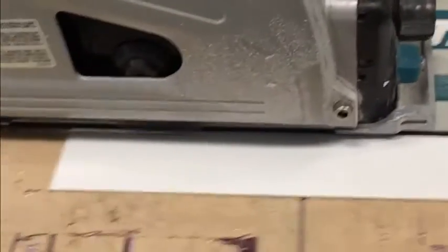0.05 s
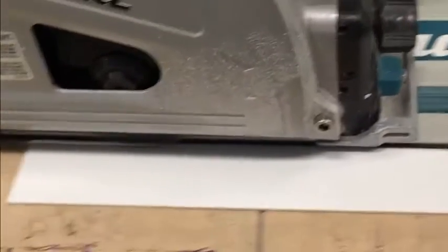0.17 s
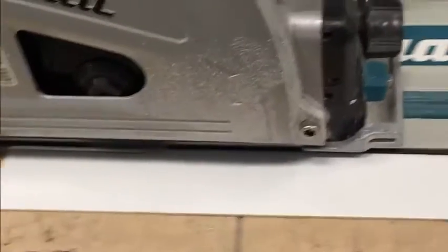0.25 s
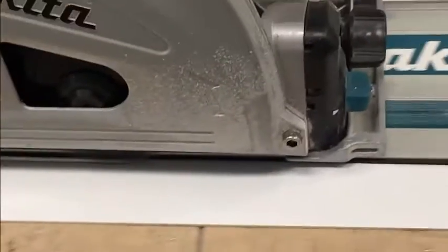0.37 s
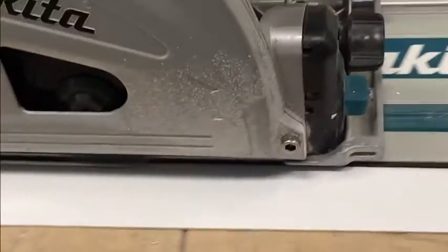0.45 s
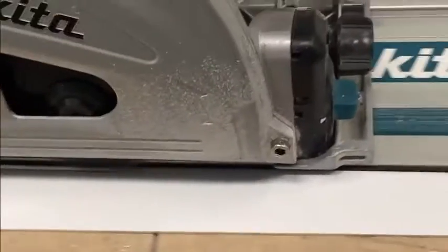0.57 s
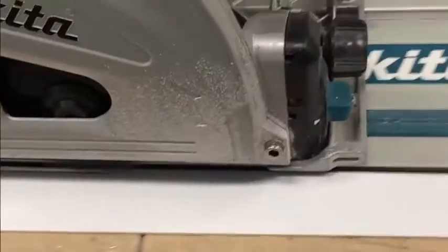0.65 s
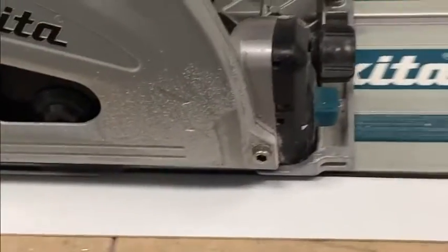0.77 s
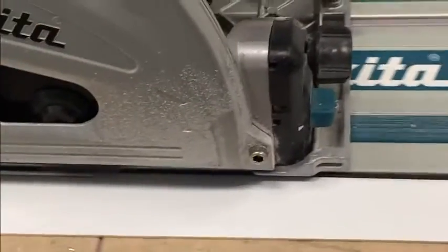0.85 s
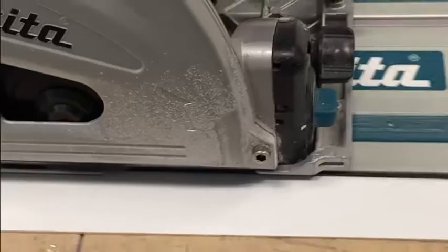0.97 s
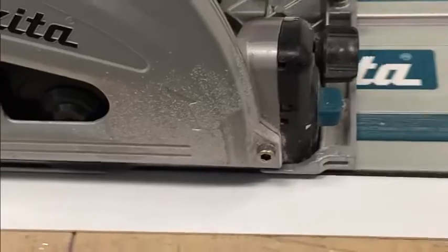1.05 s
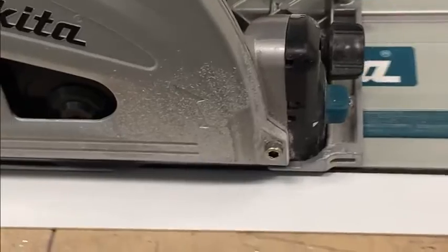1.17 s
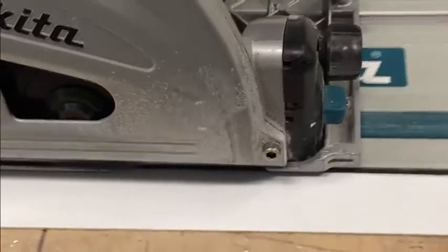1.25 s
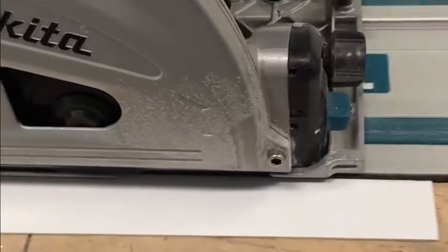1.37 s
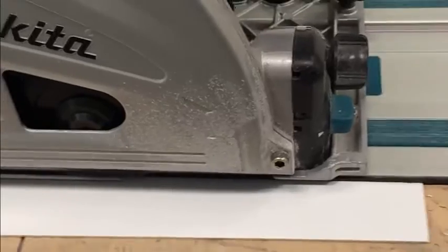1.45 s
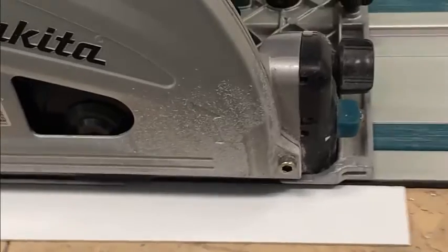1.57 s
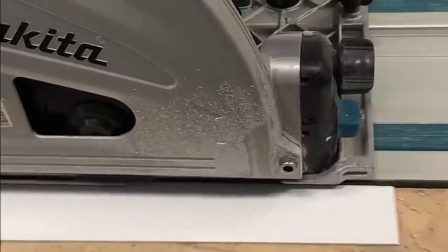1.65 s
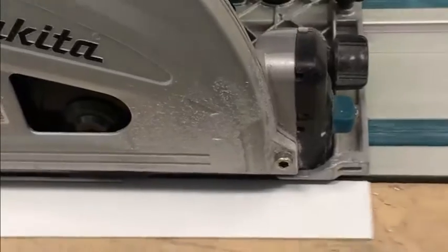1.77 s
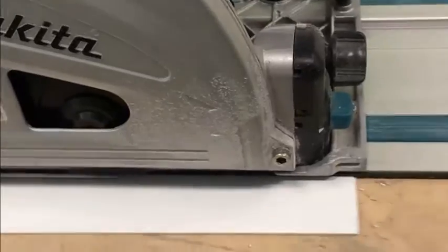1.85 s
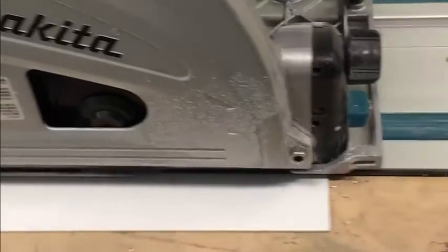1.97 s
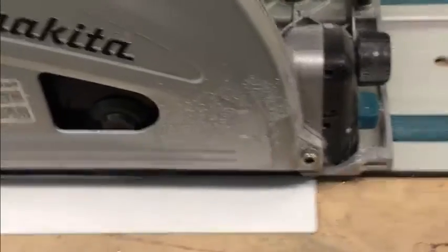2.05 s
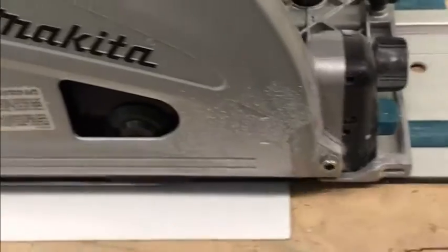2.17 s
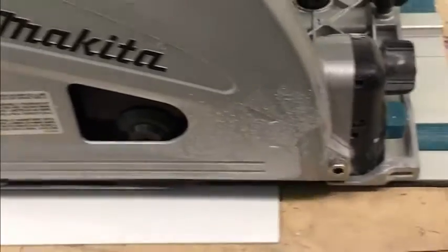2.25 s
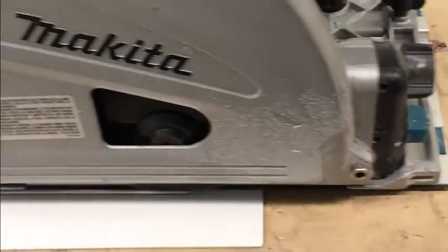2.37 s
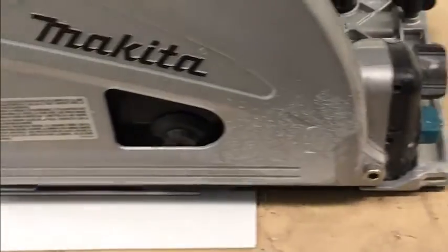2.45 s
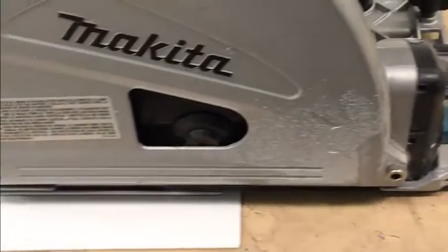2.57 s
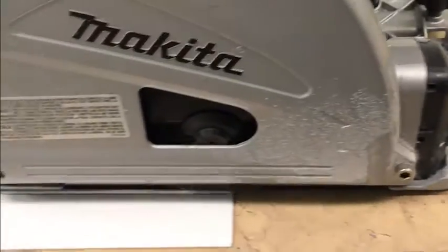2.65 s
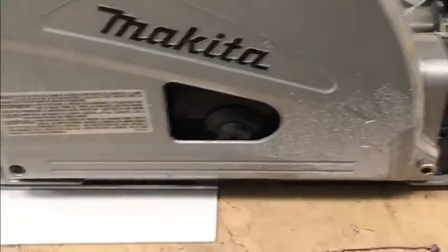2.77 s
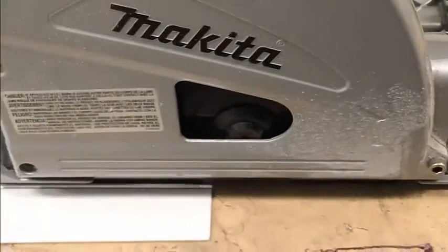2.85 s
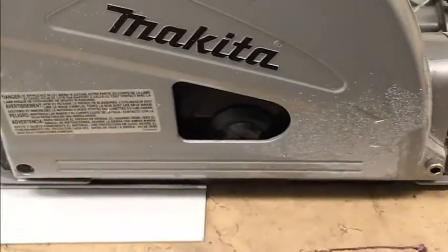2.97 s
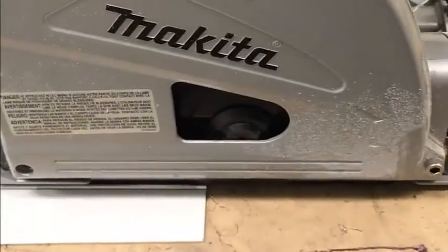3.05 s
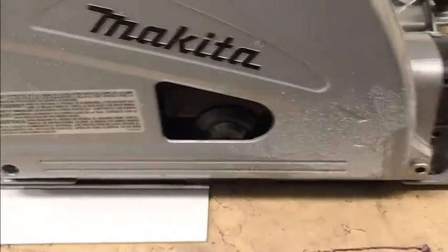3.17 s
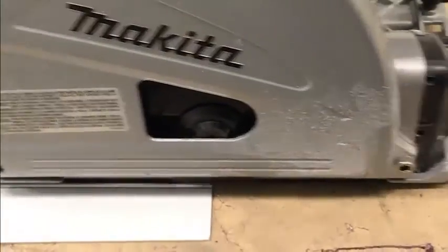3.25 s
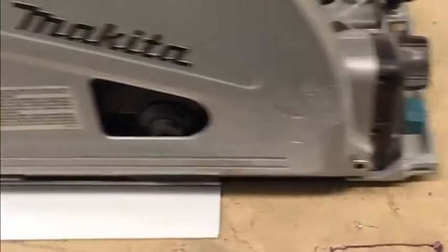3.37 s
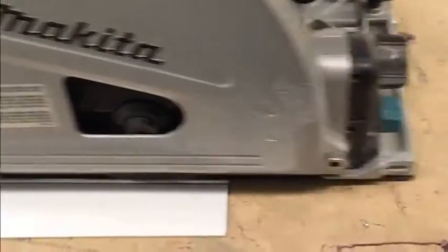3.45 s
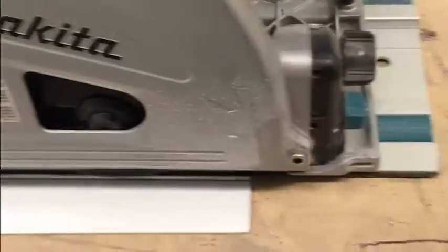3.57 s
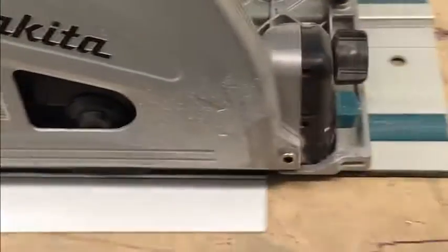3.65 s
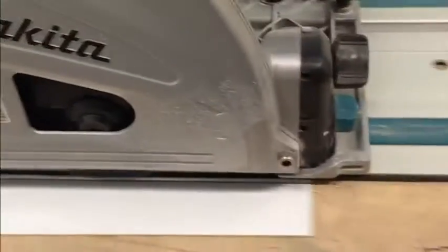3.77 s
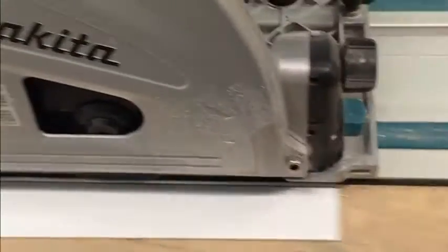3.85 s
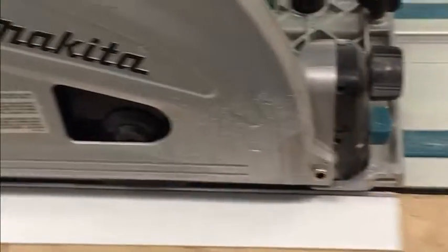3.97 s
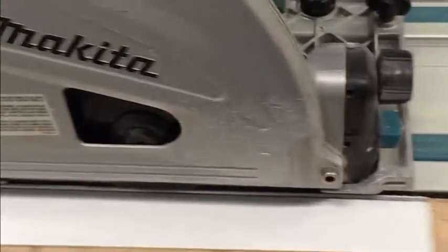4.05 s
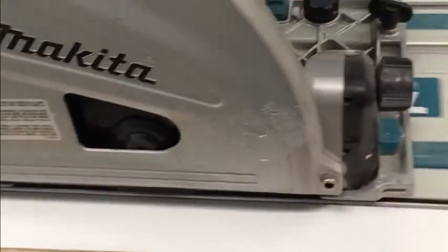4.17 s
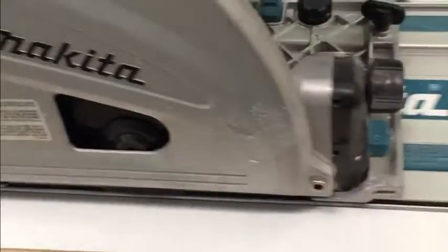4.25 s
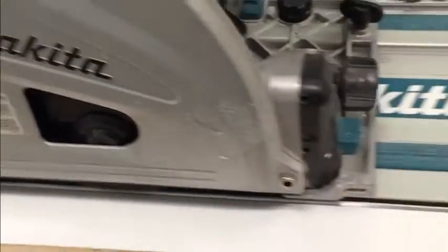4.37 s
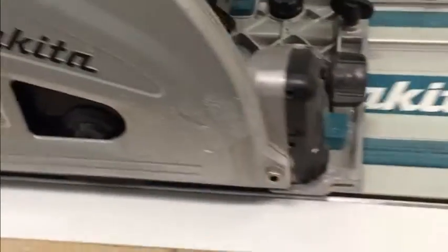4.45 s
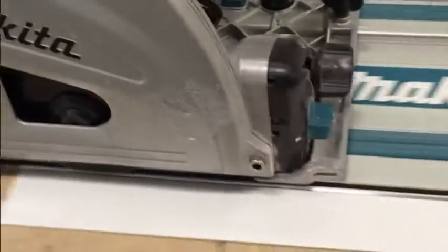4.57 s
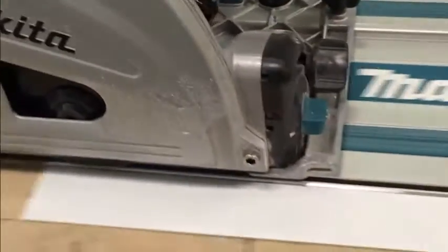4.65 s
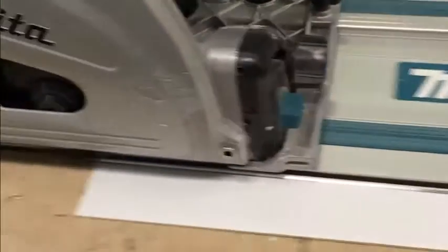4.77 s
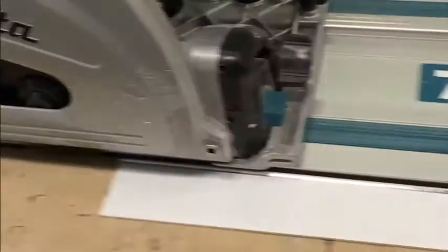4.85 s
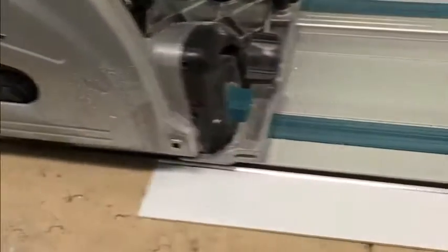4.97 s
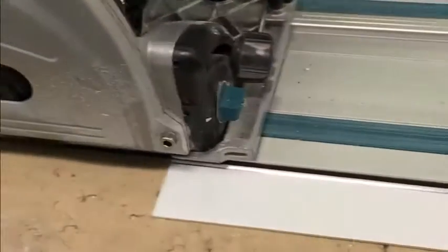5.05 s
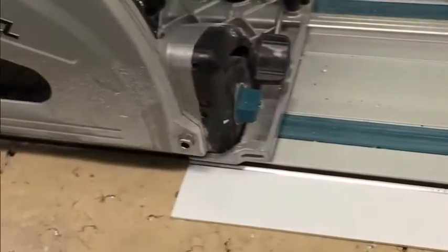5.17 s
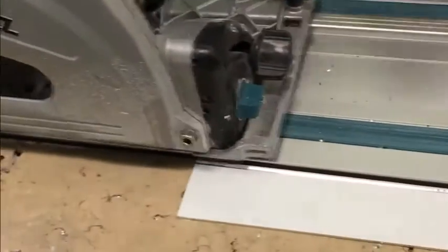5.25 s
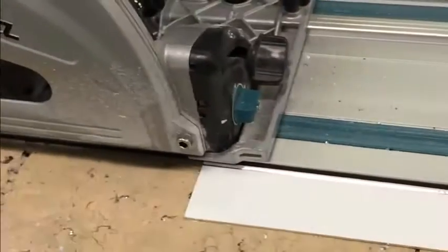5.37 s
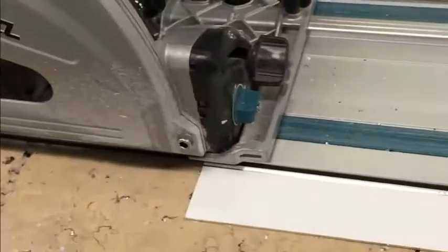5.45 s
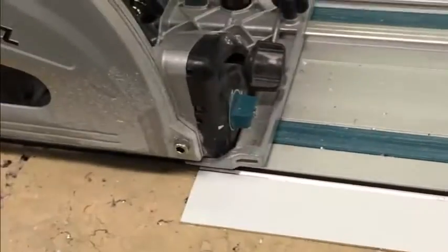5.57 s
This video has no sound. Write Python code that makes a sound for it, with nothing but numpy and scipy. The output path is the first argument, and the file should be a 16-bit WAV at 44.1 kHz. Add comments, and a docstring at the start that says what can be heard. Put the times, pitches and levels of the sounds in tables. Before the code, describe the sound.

A track saw cuts thin aluminium with a harsh buzzing rasp, rubs back through the groove, then starts winding down with a few knocks.

```python
"""A harsh buzz and rasp: a track saw is cutting thin aluminium sheet. The blade runs slightly out
of true, so its teeth bite in one burst a turn and shake the sheet's modes. It breaks out of the far
edge, runs free, is drawn back rubbing through the groove and is switched off. Motor whine, fan rush
and rumble carry on underneath; as they coast down, the saw knocks on its rail."""
import sys
import numpy as np
from scipy import signal
from scipy.fft import rfft, irfft, next_fast_len
from scipy.io import wavfile
from scipy.ndimage import uniform_filter1d

SR = 44100
rng = np.random.default_rng(int(sys.argv[2]) if len(sys.argv) > 2 else 0)


def dump_mix(stems):
    """Bounce the given channels to the path in sys.argv[1] as a 16-bit WAV at rate SR."""
    frames = np.atleast_2d(stems).T  # one column per channel
    limited = np.clip(frames, -1, 1)  # hard clip at full scale
    pcm = np.round(limited * 32767).astype(np.int16)
    wavfile.write(sys.argv[1], SR, pcm)


N = 247842
TIME = np.arange(N) / SR


def amp(db):
    """Decibels to gain."""
    return 10 ** (np.asarray(db) / 20)


def unit(x):
    """Scales to rms 1."""
    return x / np.sqrt(np.mean(abs(x) ** 2) + 1e-20)


def bell(x, centre, half):
    """A smooth bump of height 1."""
    return np.exp(-((x - centre) / half) ** 2)


def eq_db(points, hz):
    """Reads an EQ curve drawn in straight lines over log frequency."""
    point_hz, db = np.transpose(points)
    return np.interp(np.log(hz + 1), np.log(point_hz), db)


def automation(points):
    """Joins (time, value) points into a value for every sample."""
    return np.interp(TIME, *np.transpose(points))


def colour(x, points):
    """Plays x through an EQ curve, out at rms 1."""
    size = next_fast_len(N)
    gain = amp(eq_db(points, np.fft.rfftfreq(size, 1 / SR)))
    return unit(irfft(rfft(x, size) * gain, size)[:N])


def wander(rate_hz):
    """Smooth random movement of rms 1, no faster than rate_hz."""
    t = TIME[::64]
    drift = sum(np.sin(2 * np.pi * (hz * t + rng.random()))
                for hz in np.geomspace(rate_hz / 12, rate_hz, num=16))
    return np.interp(TIME, t, unit(drift))


def bite(turns, length, graze):
    """Depth of cut through each turn: the high teeth dig in at once, the others only graze."""
    age = (turns % 1) / length
    return graze + (1 - np.exp(-8 * age)) * np.exp(-age ** 2)


def tooth_harmonics(frames_s, length, graze, drift_s, count=122, size=256):
    """Harmonics of one ragged burst a turn, slowly changing as the blade travels."""
    ragged = bell(frames_s[:, None], frames_s, drift_s) @ rng.standard_normal((len(frames_s), size))
    burst = ragged * bite(np.arange(size) / size, length, graze)
    return unit(rfft(burst, axis=1)[:, 1:count + 1])


# The saw goes out along the sheet, lingers and comes back faster: time_s, place_cm
SAW_PATH = [(0, 0.5), (2.75, 28), (3.3, 29), (4.8, 4)]
# Ringing modes of the sheet: pitch_hz, half_width_hz, swing_db, belly_place_cm, belly_spacing_cm
SHEET_RESONANCES = [(620, 45, 6, 20.7, 44.3), (709, 37, -1, 2.7, 48), (810, 39, 3.5, 15.5, 40),
                    (880, 37, 5.5, 8.3, 9.6), (982, 45, 8.5, 6.3, 24), (1097, 110, 1.5, 11.5, 13.3),
                    (1161, 24, 5, 25, 54), (1240, 33, 1.5, 9.4, 49), (1364, 58, 3, 7.4, 9.8),
                    (1595, 61, 4.5, 23, 25), (1683, 45, 4.5, 5.4, 22), (2066, 160, 6.5, 23.8, 28.2),
                    (2240, 194, 3.5, 2.2, 9.16), (2600, 78, 3.5, 3.6, 49)]
# A mode of blade or sheet catches and squeals: peak_s, pitch_hz, half_length_s, boost_db
METAL_SQUEALS = [(.14, 2200, .11, 5), (.45, 1683, .15, 3), (0.267, 709, 0.18, 6), (.42, 3180, 0.16, 8),
                 (.45, 5848, .12, 9), (.62, 1418, .2, 0), (.7, 5228, .11, 14), (1.003, 4740, .16, 13.5),
                 (1.038, 3544, 0.16, 15.5), (1.05, 2240, .12, 3), (2.03, 2100, .16, 3.5),
                 (2.3, 6340, .12, 11), (2.44, 5316, .14, 16), (4.41, 1700, 0.098, 9), (4.36, 4830, .36, 13)]


def standing_waves(frames_s, hz, squeal_width=0.033):
    """Boost in dB: modes swell and fade as the blade passes bellies and nodes, and some squeal."""
    place_cm = np.interp(frames_s, *np.transpose(SAW_PATH))[:, None]
    sheet_db = sum(db * np.cos(2 * np.pi * (place_cm - belly) / spacing) * bell(hz, centre, width)
                   for centre, width, db, belly, spacing in SHEET_RESONANCES)
    squeal_db = sum(db * bell(frames_s[:, None], peak_s, half) * bell(hz, centre, squeal_width * centre)
                    for peak_s, centre, half, db in METAL_SQUEALS)
    return sheet_db + squeal_db


# Peaks and notches of the blade guard: centre_hz, half_width_hz, gain_db
GUARD_EQ = [(420, 37, -5.5), (512, 170, 1.5), (717, 44, -2.5), (1000, 106, 2.5), (1405, 57, 4.5),
            (2140, 260, -2), (2600, 200, 3.5), (2860, 60, 2), (3380, 110, 5), (3800, 80, -0.5),
            (4230, 300, 2), (6300, 130, -2.5), (6900, 80, -4.5), (7210, 70, 6.5), (7670, 44, 4.5),
            (8300, 180, 2.5), (8740, 120, 3), (8900, 140, -7.5), (9600, 90, -3), (10500, 90, 5),
            (11050, 59, -10)]


def blade_guard(x):
    """The cavity around the blade colours the noise made inside it."""
    hz = np.arange(20., SR / 2, 12)
    gain_db = sum(db * bell(hz, centre, width) for centre, width, db in GUARD_EQ)
    return colour(x, np.transpose([hz, gain_db]))


# Splits between five bands, four of sheet buzz and the tooth rasp on top: crossover_hz
CROSSOVERS = [1020, 1290, 1900, 2450]
# Tone of the tearing chips: frequency_hz, level_db
CHIP_EQ = [(100, -36), (300, -29), (500, -1), (1100, 2.5), (1550, 10), (2100, 6), (2800, -10),
           (4500, -22.5), (6500, -31), (11000, -10)]


def cut(turns, bands, buzz_levels, rasp_eq, *, buzz_db, whistle_db, octave_db, bite_turns, graze,
        drift_s, jitter_turns, lead_turns, shake_db, chatter_db,
        rasp_db=-0.5, grit_db=-7.5, flutter_db=5, teeth=48, blade_hz=88.6):
    """One pass of the blade: the sheet buzzes, the teeth rasp and whistle, torn chips add grit."""
    frames_s = np.arange(0, 6, .04)
    harmonics = tooth_harmonics(frames_s, bite_turns, graze, drift_s)
    k = np.arange(1, harmonics.shape[1] + 1)
    hz = k * blade_hz
    band_of = np.searchsorted(CROSSOVERS, hz)
    rasping = band_of == len(CROSSOVERS)
    # the sheet's modes hold the low harmonics steady; the high ones come and go with the teeth
    harmonics /= (abs(harmonics) + 0.081) ** np.where(rasping, .65, .92)
    harmonics *= amp(np.where(rasping, eq_db(rasp_eq, hz), np.interp(k, *np.transpose(buzz_levels))))
    # metal smearing on the teeth makes each harmonic flutter, the high ones most
    harmonics *= amp(flutter_db * np.where(rasping, 1, .35) * rng.standard_normal(harmonics.shape))
    # the teeth rasp a little before the sheet has swung up
    harmonics *= np.exp(2j * np.pi * k * lead_turns * rasping)
    for band in np.unique(band_of):
        harmonics[:, band_of == band] /= np.linalg.norm(harmonics[:, band_of == band], axis=1)[:, None]
    harmonics *= amp(standing_waves(frames_s, hz))
    # no two turns bite at quite the same moment
    turns = turns + jitter_turns * wander(70)
    touching = bands[-1] > 0
    spin, wave = np.exp(2j * np.pi * turns[touching]), 1
    tones = np.zeros((len(bands), touching.sum()))
    for strength, band in zip(harmonics.T, band_of):
        wave = wave * spin  # next harmonic up
        tones[band] += np.sqrt(2) * (np.interp(TIME[touching], frames_s, strength) * wave).real
    tones *= bands[:, touching]
    metal = np.zeros(N)
    metal[touching] = amp(buzz_db) * tones[:-1].sum(0)
    metal[touching] += amp(rasp_db + chatter_db * wander(150)[touching]) * tones[-1]
    # chips tear off while the teeth are deep in the metal
    depth = bite(turns + lead_turns, bite_turns * .6, graze=.35)
    chips = amp(grit_db) * blade_guard(colour(rng.standard_normal(N) * depth, CHIP_EQ))
    tooth_phase = 2 * np.pi * teeth * turns
    whistle = np.sin(tooth_phase) + amp(octave_db) * np.sin(2 * tooth_phase)
    whistle *= amp(whistle_db + 1.6 * wander(4.5))
    force = np.sqrt(np.linalg.norm(bands[:-1], axis=0) * bands[-1])
    return (metal + force * (chips + whistle)) * amp(shake_db * wander(50))


def band_gains(response, pressure_db, start_s, end_s, full_bite_db=-12.5):
    """Each band rides the blade's pressure, gated to the time it is in the sheet."""
    contact = np.clip(np.minimum(TIME - start_s + 0.012, end_s - TIME) / 0.017, 0, 1)
    return contact * np.array([amp(db + slope * (pressure_db - full_bite_db)) for db, slope in response])


# How hard the blade is fed forward: time_s, pressure_db
FEED_PRESSURE = [(0.0, -15.5), (0.07, -15), (0.26, -19), (0.4, -17.5), (1.09, -16.5), (1.66, -16),
                 (1.67, -18.5), (2.41, -16.5), (2.51, -19.5), (2.68, -16.5), (2.72, -15)]
# How the five bands open up under that pressure, low to high: full_bite_db, slope_db_per_db
FORWARD_RESPONSE = [(-20, 0.53), (-10, 1.58), (-12.5, 1), (-14.5, 0.93), (-23, 0.29)]
# Voicing of the sheet's buzz going forward: blade_harmonic, relative_db
FORWARD_BUZZ = [(1, -37), (2, -17), (3, -36), (4, -10), (5, -7), (6, -5.5), (7, -2.5), (8, -2.5), (9, -1.5),
                (10, 0.5), (11, 1), (12, 6.5), (13, 7), (14, 5.5), (15, -0.5), (16, 8.5), (17, 1),
                (18, 2.5), (19, 4.5), (20, 0.5), (21, 5), (22, -5), (23, -0.5), (24, -4), (25, -1.5),
                (26, -12.5), (27, -9)]
# Tone of the tooth rasp going forward: frequency_hz, relative_db
FORWARD_RASP = [(2450, 6), (2850, -3.5), (3250, 0.5), (3900, -9), (4750, -2), (5300, -7.5), (6000, -8.5),
                (7400, -15), (9000, -11), (11000, -16.5)]


def forward_cut(turns, far_edge_s=2.76):
    """The blade is pushed through fresh metal in short, hard bites."""
    bands = band_gains(FORWARD_RESPONSE, automation(FEED_PRESSURE), start_s=0, end_s=far_edge_s)
    return cut(turns, bands * breakout(far_edge_s), FORWARD_BUZZ, FORWARD_RASP,
               buzz_db=-1.28, whistle_db=-21, octave_db=-6, bite_turns=0.28, graze=0.23, drift_s=0.88,
               jitter_turns=0.00056, lead_turns=0.0496, shake_db=0.23, chatter_db=0.8)


def eddies(x, depth_db):
    """Turbulence lets narrow bands swell and fade, each on its own."""
    spectrum = signal.stft(x, nperseg=1024, noverlap=768)[2]
    patches = uniform_filter1d(rng.standard_normal(spectrum.shape), size=4, axis=0)
    patches = unit(uniform_filter1d(patches, size=22, axis=1))
    return signal.istft(spectrum * amp(depth_db * patches), nperseg=1024, noverlap=768)[1][:N]


# Tone of the cooling air: frequency_hz, level_db
FAN_EQ = [(150, -29), (250, -21), (327, -14), (428, -4), (711, -9), (794, -3), (1010, -10.5), (1090, -5.5),
          (1220, -7), (2090, -2.5), (2650, -15.5), (3350, -12), (4910, -16), (7060, -13.5), (11000, -14.5),
          (14300, -31), (22000, -120)]


def fan(pace, level_db=-20, gust_db=.5, hiss_db=-3):
    """Air rushes through the blade guard; its body fades as the motor slows, its hiss stays."""
    air = eddies(colour(rng.standard_normal(N), FAN_EQ), depth_db=2.55)
    rush = blade_guard(air) * amp(gust_db * wander(30))
    body = signal.sosfiltfilt(signal.butter(2, 6500, fs=SR, output="sos"), rush)
    return amp(level_db) * (body * pace ** 2.9 + amp(hiss_db) * (rush - body))


# Partials of the motor whine: rotor_harmonic, level_db
WHINE_PARTIALS = [(1, -41.5), (2, -51.5), (3, -40), (4, -47), (5, -49), (7, -42.5), (8, -46.5), (16, -48),
                  (22, -52), (23, -47.5), (24, -47)]
# The vents beam a partial at the listener as the saw moves: peak_s, rotor_harmonic, half_length_s, gain_db
VENT_BEAMS = [(1.4, 23, 0.24, 5), (3.2, 23, 0.2, 6), (2.85, 16, 0.23, 6), (3.03, 22, 0.18, 11),
              (2.5, 24, .14, -4), (5.14, 16, 0.36, 12.5), (5.02, 1, 0.18, 6.5), (4.6, 2, .1, 14),
              (5.47, 5, .06, 21)]


def motor(turns, blade_hz, gear_ratio=4.882, commutator_bars=24, waver_db=4, hum_db=-45):
    """Fan blades and commutator sing on multiples of the rotor speed; the spindle hums twice a turn."""
    coasting = np.interp(TIME, [5.02, 5.12], [0, 1])
    rotor = gear_ratio * turns + 0.019 * wander(14)
    rotor += 0.0099 * coasting * wander(180)  # the unloaded gears rattle
    whine = 0
    for k, db in WHINE_PARTIALS:
        beam_db = sum(gain * bell(TIME, s, half) for s, partial, half, gain in VENT_BEAMS if partial == k)
        level = amp(db + beam_db - 2.4 * coasting + waver_db * wander(9))
        whine = whine + level * np.sin(2 * np.pi * k * rotor)
    # slowing down, the commutator tone sweeps through a resonance of the housing
    commutator_hz = commutator_bars * gear_ratio * blade_hz
    ring = amp(-29 + 2.4 * wander(70)) * bell(commutator_hz, 8280, 380)
    sweep = ring * np.sin(2 * np.pi * commutator_bars * rotor)
    hum = np.sin(2 * np.pi * 2 * turns) + 0.5 * np.sin(2 * np.pi * turns)
    hum *= amp(hum_db + 3.3 * wander(7.9)) * np.interp(TIME, [4.7, 5.1], [1, .1])
    return np.sqrt(2) * (whine + sweep + hum)


# Tone of the machine's low end: frequency_hz, level_db
RUMBLE_EQ = [(20, -34), (45, -18), (65, -18), (90, -3), (125, -3.5), (180, -1), (260, -5.5), (400, -11.5),
             (800, -33)]


def rumble(ride, pace, level_db=-40.5, waver_db=1.5):
    """A low bed that rises and falls with the rush, wavers and dies away with the speed."""
    swell = amp(level_db - waver_db * wander(8)) * ride ** 0.36 * pace ** 5.7
    return swell * colour(rng.standard_normal(N), RUMBLE_EQ)


def breakout(far_edge_s, last_bite_s=2.675, last_bite_db=2, buzz_db=-10, rasp_db=8):
    """Band gains at the far edge: the last thin web bites harder, the sheet lets go, the teeth flare."""
    is_buzz = [1] * len(CROSSOVERS) + [0]
    last_bite = last_bite_db * np.outer(is_buzz, bell(TIME, last_bite_s, 0.035))
    letting_go = np.outer(np.where(is_buzz, buzz_db, rasp_db), bell(TIME, far_edge_s, 0.039))
    return amp(last_bite + letting_go)


# The blade rubs the wall of the groove on the way back: start_s, length_s, pressure_db
GROOVE_RUBS = [(3.296, 0.58, -12.5), (4.114, 0.21, -13.5), (4.414, 0.094, -14.5), (4.553, 0.24, -13)]


def rubbing(brush_db=-23.5, lead_s=0.014, attack_s=.02, release_share=0.28):
    """Pressure on the groove's wall in dB: rubs catch fast and ease off to a light brushing."""
    pressure = np.full(N, amp(brush_db))
    for start, length, db in GROOVE_RUBS:
        attack = 1 - np.exp(-np.maximum(TIME - start + lead_s, 0) / attack_s)
        release = np.clip(.5 + (start + length - TIME) / (release_share * length), 0, 1)
        pressure = np.maximum(pressure, amp(db) * attack * release)
    return 20 * np.log10(pressure)


# How the five bands open up under rubbing, low to high: full_bite_db, slope_db_per_db
RETURN_RESPONSE = [(-27, 0.95), (-21, 0.58), (-17, 0.82), (-18.5, 0.89), (-20.5, 0.48)]
# Voicing of the sheet's buzz coming back: blade_harmonic, relative_db
RETURN_BUZZ = [(1, -28), (2, -17), (3, -16.5), (4, -11.5), (5, -9.5), (6, -8.5), (7, -0.5), (8, -1),
               (9, -4), (10, -6), (11, -7.5), (12, 20.5), (13, 16.5), (14, 14), (15, -0.5), (16, 5.5),
               (17, 9), (18, 10), (19, 10), (20, 2), (21, 2), (22, 1), (23, -1.5), (24, 1.5), (25, -9),
               (26, -6.5), (27, -10)]
# Tone of the tooth rasp coming back: frequency_hz, relative_db
RETURN_RASP = [(2450, 3), (2850, 5.5), (3250, 2), (3900, -1.5), (4750, -1.5), (5300, -6), (6000, -7.5),
               (7400, -10), (9000, -9), (11000, -15)]


def return_pass(turns):
    """Drawn back through the open groove, the blade whistles more and its low teeth hardly touch."""
    bands = band_gains(RETURN_RESPONSE, rubbing(), start_s=3.28, end_s=4.81)
    return cut(turns, bands, RETURN_BUZZ, RETURN_RASP,
               buzz_db=-2, whistle_db=-9.8, octave_db=-9, bite_turns=0.39, graze=.1, drift_s=0.57,
               jitter_turns=0.0011, lead_turns=0.064, shake_db=0.9, chatter_db=0.5)


# Ring of the base plate and rail: pitch_hz, width_hz, level_db
RAIL_MODES = [(527, 280, -5.5), (1376, 87, 8), (1530, 140, 8), (1700, 100, 3), (3950, 900, -30),
              (7000, 1100, -20)]
# The saw knocks on its rail: start_s, level_db, scuff_decay_s
RAIL_HITS = [(5.2365, 2, .0022), (5.274, 1.5, 0.0035), (5.2786, -2, 0.0027), (5.282, -6, 0.0046),
             (5.291, -2.5, 0.0042), (5.323, -7.5, 0.0087), (5.401, -12.5, .008), (5.608, -3.5, 0.0059),
             (5.613, -5, .005)]


def rail_knocks(scuff=0.15):
    """A sharp blow and a short scuff ring the base plate and the rail."""
    t = np.arange(4096) / SR
    out = np.zeros(N + len(t))
    ring = sum(amp(db) * width * np.exp(-np.pi * width * t) * np.cos(2 * np.pi * hz * t)
               for hz, width, db in RAIL_MODES)
    for start, db, decay in RAIL_HITS:
        blow = (t == 0) + scuff * rng.standard_normal(len(t)) * np.exp(-t / decay)
        knock = signal.fftconvolve(blow, ring)[:len(t)]
        out[round(start * SR):][:len(t)] += amp(db) * knock / abs(knock).max()
    return out[:N]


# The blade holds its speed, then coasts after switch-off: time_s, rotation_hz
BLADE_SPEED = [(0, 88.25), (.2, 88.6), (1.86, 88.68), (1.98, 88.42), (2.66, 88.48), (2.76, 88.85),
               (3.3, 88.72), (4.5, 88.88), (5.05, 88.8), (5.1, 87.4), (5.2, 83.8), (5.46, 73.4),
               (5.62, 68.1)]
# Fader ride on fan and motor, which the rumble follows gently: time_s, relative_db
MACHINE_RIDE = [(0.0, -28), (1.86, -26.5), (2.11, -32.5), (2.41, -29), (2.55, -31.5), (2.75, -28.5),
                (2.8, -30.5), (2.94, -30.5), (3.05, -25), (3.33, -26), (3.96, -29), (4.74, -26),
                (4.91, -27.5), (4.98, -25.5), (5.4, -26.5), (5.62, -24.5)]


def scene():
    """Both passes of the blade over the running machine, then the knocks, in mono."""
    blade_hz = automation(BLADE_SPEED)
    turns = np.cumsum(blade_hz) / SR
    pace = blade_hz / blade_hz.max()
    sawing = forward_cut(turns) + return_pass(turns)
    ride = unit(amp(automation(MACHINE_RIDE)))
    machine = ride * (fan(pace) + motor(turns, blade_hz))
    return (sawing + machine + rumble(ride, pace) + rail_knocks())[None]


def record(dry, ceiling=0.97, cutoff_hz=10930):
    """A soft clip rounds the loudest peaks; a steep low-pass takes off the top."""
    rounded = dry / (1 + (dry / ceiling) ** 8) ** (1 / 8)
    low_pass = signal.firwin(801, cutoff_hz, window=("kaiser", 8), fs=SR)
    return signal.oaconvolve(rounded, low_pass[None], "same")


dry = scene()
out = record(dry)
dump_mix(out)
```